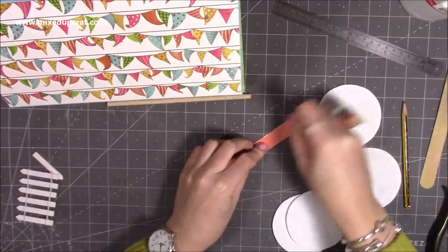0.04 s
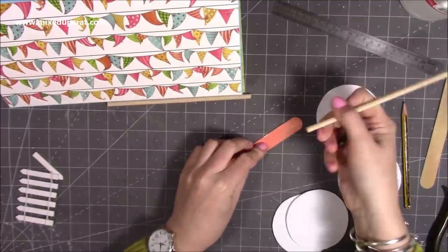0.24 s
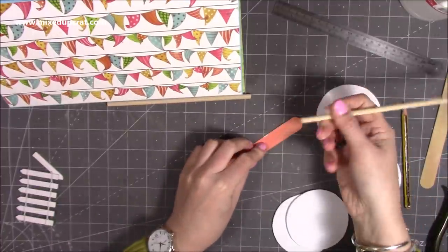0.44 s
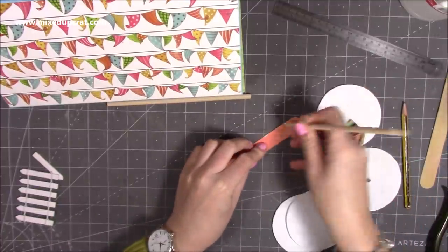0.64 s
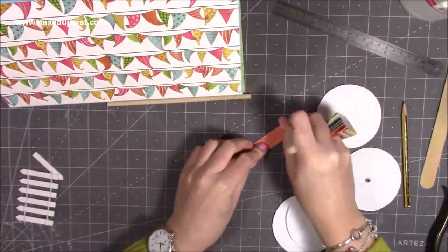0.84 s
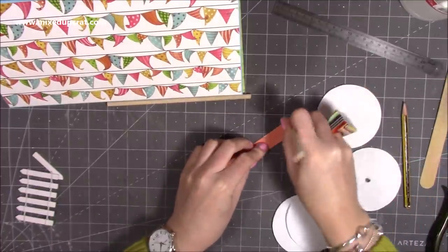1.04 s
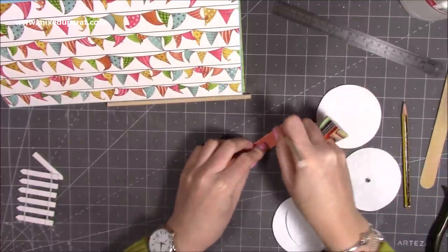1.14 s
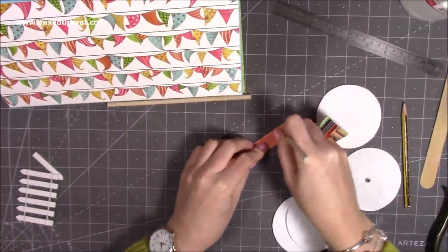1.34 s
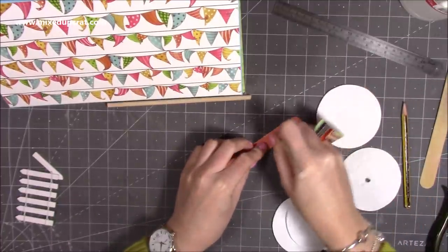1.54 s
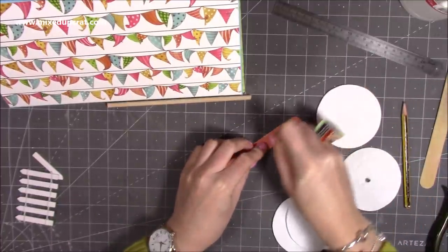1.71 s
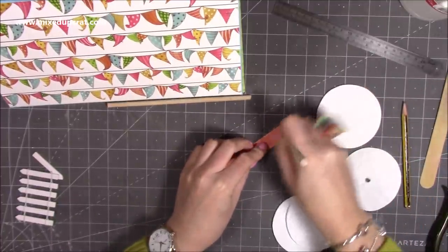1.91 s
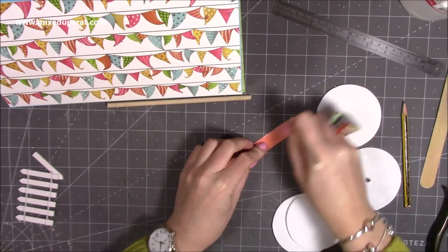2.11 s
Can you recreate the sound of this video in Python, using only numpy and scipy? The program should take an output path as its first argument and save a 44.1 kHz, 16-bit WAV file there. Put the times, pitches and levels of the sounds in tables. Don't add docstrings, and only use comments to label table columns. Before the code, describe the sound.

A small knock and the tail of a stroke, a near-silent pause with faint bangle clinks, then a wooden dowel end is scrubbed rapidly to and fro on an emery board, close up in a quiet room.

```python
import sys
import numpy as np
from scipy import signal
from scipy.fft import rfft, irfft
from scipy.io import wavfile
from scipy.ndimage import uniform_filter1d

SR = 44100
rng = np.random.default_rng(int(sys.argv[2]) if len(sys.argv) > 2 else 0)


def inscribe(sig):
    pcm = np.round(np.clip(np.atleast_2d(sig).T, -1, 1) * 32767)
    wavfile.write(sys.argv[1], SR, pcm.astype(np.int16))


def attenuation_scalar(level_db):
    decades = np.asarray(level_db, float) / 20
    return 10 ** decades


N = 95564


def evened(x):
    return x / np.sqrt(np.mean(x ** 2) + 1e-20)


def read(points, hz):
    f, value = np.transpose(points)
    return np.interp(np.log(hz + 1), np.log(f + 1), value)


def at_time(table, s):
    times, *columns = np.transpose(table)
    return [np.interp(s, times, column) for column in columns]


def add(mix, s, sound):
    at = round(s * SR)
    part = mix[max(at, 0):][:len(sound) + min(at, 0)]
    part += sound[max(-at, 0):][:len(part)]


def resonate(x, hz, width):
    r = np.exp(-np.pi * width / SR)
    poles = [1, -2 * r * np.cos(2 * np.pi * hz / SR), r * r]
    return signal.lfilter([(1 - r * r) / 2, 0, (r * r - 1) / 2], poles, x)


def colour(x, points):
    gain = attenuation_scalar(read(points, np.fft.rfftfreq(len(x), 1 / SR)))
    return irfft(rfft(x) * gain, len(x))


def filing():
    # start_s, length_s, grit_db, wood_db, hardest_place (0-1)
    pushes = [(.716, 0.064, -52.5, -37, 0.76), (.927, 0.034, -50.5, -33.5, 0.3),
              (1.11, 0.049, -49, -32, 0.52), (1.302, 0.044, -49, -34.5, 0.04),
              (1.490, 0.059, -46.5, -26, 0.73), (1.677, 0.054, -44, -26, 0.74),
              (1.854, 0.068, -45.5, -29, 0.24), (2.035, 0.058, -44.5, -27.5, 0.8)]
    pulls = [(-.05, 0.059, -51, -49, 0.44), (.822, 0.028, -52, -39, 0.3), (.853, 0.014, -59.5, -51, 0.68),
             (1.01, 0.06, -46.5, -33, 0.67), (1.212, 0.049, -46, -30.5, 0.32),
             (1.395, 0.058, -47.5, -32.5, 0.52), (1.586, 0.059, -46.5, -39, 1),
             (1.765, 0.061, -47, -34, 0.4), (1.949, 0.051, -44.5, -35, 0.092),
             (2.126, 0.057, -46.5, -35, 0.48)]
    # time_s, extra_db at the stroke ends, table_weight_db
    settling = [(0, 8, -14), (.7, -11.5, 5.5), (1.0, -6.5, -4), (1.4, 1.5, 0.5), (1.55, 1.5, -4.5),
                (1.95, -7.5, 1.5), (2.1, -0.5, -1.5)]
    # pitch_hz, density_db per Hz
    grit_colour = [(300, -6.5), (900, -2), (2000, 2.5), (3600, -5), (5300, -9), (9000, -10.5), (12000, -16),
                   (15500, -28.5)]
    wood_ends_db, grit_ends_db = -14, 0.5
    push_table_db, pull_table_db = -4.5, 3
    hiss_db, snag_hiss = 8.5, 0.34
    filing_cut_hz = 153

    drive, jump_db = catches(), snags()
    grit, weight, out = np.zeros(N), np.zeros(N), np.zeros(N)
    for way, (strokes, table_db) in enumerate([(pushes, push_table_db), (pulls, pull_table_db)]):
        for start, length, grit_db, wood_db, top in strokes:
            soft_db, weight_db = at_time(settling, start)
            scrape = attenuation_scalar(grit_db) * pressure(start, length, top, grit_ends_db + soft_db)
            grit += scrape
            weight += scrape * attenuation_scalar(table_db + weight_db)
            wood_push = pressure(start, length, top, wood_ends_db + soft_db / 2)
            wood_push = attenuation_scalar(wood_db - 2.5 + jump_db) * wood_push * drive
            ring_wood(out, start, way, wood_push)
    hiss = patchy(colour(drive + catches(), grit_colour))
    out += attenuation_scalar(hiss_db + snag_hiss * jump_db) * grit * hiss
    out += table_rumble(weight)
    return signal.sosfilt(signal.butter(4, filing_cut_hz, "high", fs=SR, output="sos"), out)


def catches():
    catches_per_s, spread_db, flicker_db = 9000, 1.5, -0.5
    hit = (rng.random(N) < catches_per_s / SR) * rng.choice([-1., 1.], N)
    flicker = uniform_filter1d(rng.standard_normal(N), size=130)
    flicker = evened(uniform_filter1d(flicker, size=130))
    size_db = spread_db * np.minimum(rng.exponential(1, N), 5)
    return evened(hit * attenuation_scalar(size_db + flicker_db * flicker))


def snags():
    # time_s, jump_db, dying_s
    grains = [(0.7313, 6, 0.0044), (0.7487, 9.5, 0.011), (0.762, -5, 0.0095), (0.834, 13, 0.011),
              (0.943, 3, 0.0096), (1.0196, 0, .005), (1.0363, 6.5, 0.007), (1.052, 2.5, 0.0045),
              (1.071, 13, 0.0064), (1.1292, 8, 0.0035), (1.234, 5.5, .007), (1.3177, 8, 0.0052),
              (1.331, 7.5, 0.0046), (1.4314, 5, 0.0086), (1.5062, 7.5, .006), (1.526, 1, 0.0061),
              (1.539, 1.5, 0.0045), (1.631, 3, 0.004), (1.6868, 7.5, 0.0051), (1.705, 3.5, 0.011),
              (1.722, -9, 0.005), (1.8022, 11.5, 0.012), (1.8644, 5.5, 0.017), (1.8955, 5.5, 0.0034),
              (1.9555, 1, 0.0045), (2.049, 6, 0.0056), (2.072, 4, 0.0053)]
    out, t = np.zeros(N), np.arange(SR // 20) / SR
    for s, jump_db, dying in grains:
        add(out, s, jump_db * np.exp(-(t / dying) ** 2))
    return out


def pressure(start, length, top, ends_db):
    attack_s, release_s = 0.0049, 0.0067
    drag_db, drag_db_per_s = -12, 311
    t = np.arange(N) / SR - start
    top = np.clip(top, .1, .9)
    off = np.where(t < top * length, 1 - t / (top * length), (t / length - top) / (1 - top))
    held = np.clip((length - t) / release_s + .5, 0, 1) * attenuation_scalar(ends_db * np.clip(off, 0, 2) ** 2)
    drag = attenuation_scalar(drag_db - drag_db_per_s * np.maximum(t - length, 0))
    return np.clip(t / attack_s, 0, 1) * (held + drag)


def ring_wood(out, start, way, wood_push):
    # pitch_hz, width_hz, push_db, pull_db
    wood = [(1106.7, 25.6, 1, -14), (1307, 120, -2.5, 1.5), (1582, 58, -1.5, 1.5), (1828, 100, 1.5, 3.5),
            (1924, 210, -8.5, 2.5), (2358, 240, 0, 3.5), (2590, 240, -1, -0.5), (889, 94, -4, -6),
            (3060, 2200, -17, -10), (4200, 100, -17, -51)]
    # stroke_start_s, favoured_hz, loss_db one octave off
    grip = [(0, 1390, 30), (.716, 1414, 57), (.822, 1600, 0), (.927, 1450, 43), (1.01, 1670, 20),
            (1.11, 1350, 10), (1.212, 1820, 3), (1.304, 1400, 13), (1.397, 1710, 8), (1.491, 1370, 6),
            (1.587, 1770, 17), (1.677, 1610, 6), (1.768, 2100, 20), (1.856, 1940, 6.5), (1.951, 1700, 8),
            (2.038, 1620, 3), (2.126, 1630, 14)]
    favoured_hz, loss_db = at_time(grip, start)
    gains = attenuation_scalar([row[2 + way] - max(loss_db, 0) * np.log2(row[0] / favoured_hz) ** 2 for row in wood])
    gains = gains / np.linalg.norm(gains)
    shifts = 1 + 0.012 * rng.uniform(-1.1, 1, len(wood))
    at = max(round(start * SR), 0)
    wood_push = wood_push[at:at + SR // 4]
    for j, (hz, width, *_) in enumerate(wood):
        gain = (-1) ** j * gains[j] / np.sqrt(np.pi * width / SR)
        add(out, at / SR, gain * resonate(wood_push, hz * shifts[j], width))


def table_rumble(weight):
    # pitch_hz, width_hz, level_db
    table_modes = [(150, 70, -8), (205, 95, -1), (310, 110, -4), (400, 120, -3), (525, 120, -2),
                   (700, 180, -5)]
    rumble = weight * rng.standard_normal(N)
    out = np.zeros(N)
    for hz, width, db in table_modes:
        mode = resonate(resonate(rumble, hz, width), hz, 2.14 * width)
        out += attenuation_scalar(db) / np.sqrt(np.pi * width / SR) * mode
    return out


def patchy(x):
    patchy_db = 3
    z = signal.stft(x, nperseg=128)[2]
    field = uniform_filter1d(rng.standard_normal(z.shape), size=4, axis=0)
    field = evened(uniform_filter1d(field, size=9, axis=1))
    return evened(signal.istft(z * attenuation_scalar(patchy_db * field), nperseg=128)[1][:N])


def bangles():
    # time_s, main_db, low_db, top_db, thin_db (ring level of each mode group)
    clinks = [(0.102, -65, -50, -62, -57), (0.1105, -40, -62, -43, -53), (.4948, -68, -57.5, -85, -73),
              (0.5931, -44.5, -60.5, -54, -56), (0.9282, -32, -66, -40, -48),
              (0.9458, -42, -32, -41, -37.5), (.9744, -65, -63, -67, -51), (1.1366, -33, -45, -38, -55),
              (1.169, -43.5, -38, -66, -45), (1.1972, -40.5, -42, -55, -50), (1.323, -33.5, -43, -44, -49),
              (1.3368, -37, -59, -44, -46), (1.3668, -36, -34.5, -60, -42.5), (1.55, -40, -46, -77, -48),
              (1.656, -53, -65, -65, -61), (1.6902, -32.5, -36, -45, -36.5), (1.8254, -42, -62, -79, -52),
              (1.89, -34.5, -48, -44, -46), (1.9174, -56, -55, -75, -63), (1.942, -49, -54, -58, -50),
              (2.027, -48, -58, -70, -50), (2.0602, -37.5, -39, -53, -45), (2.0883, -67, -47, -70, -70)]
    # pitch_hz, t60_s, level_db within the group
    mode_groups = [
        [(5648, .19, -14), (5676, .075, -6), (5745, .035, -5), (6200, .025, -12), (8200, .08, -9),
         (8165, .14, -20)],
        [(3500, .07, -4), (3560, .04, -9), (7420, .06, -11)],
        [(12480, .05, -2), (12620, .025, -4)],
        [(9900, .06, -1), (8850, .035, -9), (11700, .035, -11), (14600, .03, -14), (15300, .03, -14)],
    ]
    spread_db = 2
    splash_db, splash_hz, splash_s = -15, 9500, 0.002
    out, t = np.zeros(N), np.arange(SR // 100) / SR
    for s, *levels in clinks:
        for level_db, group in zip(levels, mode_groups):
            for hz, t60, db in group:
                strike_db = level_db + db + spread_db * rng.uniform(0.14, 1)
                add(out, s, ring(hz, strike_db, t60))
        splash = evened(resonate(rng.standard_normal(len(t)), splash_hz, 5500)) * np.exp(-t / splash_s)
        add(out, s, attenuation_scalar(max(levels) + splash_db) * splash)
    return out


def ring(hz, db, t60):
    roughness, rise_s = .35, .0007
    t = np.arange(SR // 4) / SR
    rough = 1 + roughness * evened(uniform_filter1d(rng.standard_normal(len(t)), size=150))
    return attenuation_scalar(db - 60 * t / t60) * np.minimum(t / rise_s, 1) * rough * np.sin(2 * np.pi * hz * t)


def knocks():
    # time_s, ring_db, pitch_hz, t60_s
    taps_and_ticks = [(.001, -29, 8280, 0.02), (.0055, -25, 1364, 0.011), (.019, -55, 1410, 0.041),
                      (.096, -49, 1290, 0.013), (0.103, -43, 7420, 0.031), (.111, -38.5, 8180, 0.022),
                      (.495, -57, 8100, .03), (0.663, -46, 1280, .035), (0.664, -53.5, 1530, 0.027),
                      (.662, -52, 880, 0.026), (.665, -58, 2900, .015), (.661, -52.5, 8300, 0.028),
                      (.663, -54, 9200, .02), (.681, -64, 9000, .01), (0.747, -29, 1460, 0.037),
                      (.785, -64, 8260, .04), (.904, -60, 8500, 0.0087), (.904, -63, 11200, .008),
                      (.921, -38, 1380, 0.017), (.946, -27.5, 1417, 0.049), (.975, -49, 8850, .045),
                      (1.236, -33, 1720, .015), (1.896, -23.5, 1146, 0.025), (1.9423, -49, 7500, .05),
                      (2.026, -48, 7400, .05), (1.545, -47, 3520, .05), (1.866, -43, 4170, .06)]
    out = np.zeros(N)
    for s, db, hz, t60 in taps_and_ticks:
        add(out, s, ring(hz, db, t60) + ring(hz * 1.06, db - 5, t60))
    return out


def slides():
    # middle_s, length_s, level_db, whistle_1_hz, whistle_2_hz
    rubs = [(.09, .03, -77, 9600, 12600), (.243, .02, -70, 4000, 4100), (.244, .022, -70, 9800, 7000),
            (.378, .035, -71, 10000, 13200), (.482, .028, -71, 9600, 6800), (.54, .06, -79, 9500, 12700)]
    hiss_db, whistle_width_hz = -1, 300
    out, t = np.zeros(N), np.arange(-2000, 2000) / SR
    for s, length, db, *whistles in rubs:
        noise = rng.standard_normal(len(t))
        rub = attenuation_scalar(hiss_db) * evened(resonate(noise, 9200, 7000))
        for hz in whistles:
            rub = rub + evened(resonate(noise, hz, whistle_width_hz))
        add(out, s + t[0], attenuation_scalar(db) * rub * np.exp(-(t / (length / 2)) ** 2))
    return out


def room(x):
    # pitch_hz, t60_s
    decay = [(200, 0.46), (1500, 0.13), (6000, 0.092), (14000, 0.055)]
    taps = np.zeros(SR // 2)
    at = np.arange(200, SR // 2 - 20, 20)
    taps[at + rng.integers(0, 20, len(at))] = rng.choice([-1., 1.], len(at))
    hz, t, z = signal.stft(taps, SR, nperseg=256)
    dying = attenuation_scalar(-60 * t / read(decay, hz)[:, None])
    tail = signal.istft(z * dying, SR, nperseg=256)[1]
    return signal.fftconvolve(x, tail / np.linalg.norm(tail))[:N]


def air():
    # pitch_hz, density_db per Hz
    hush_colour = [(40, 3), (150, 0), (450, -4), (700, -8), (1300, -9), (4400, -18), (10000, -26),
                   (15500, -38)]
    hush_db = -60
    hum_hz, hum_width_hz, hum_db = 826, 116, -66.5
    hum = resonate(rng.standard_normal(N), hum_hz, hum_width_hz)
    hum = resonate(hum, hum_hz, 2 * hum_width_hz)
    hush = colour(rng.standard_normal(N), hush_colour)
    return attenuation_scalar(hush_db) * evened(hush) + attenuation_scalar(hum_db) * evened(hum)


def scene():
    room_db = -11.5
    near = filing() + bangles() + knocks() + slides()
    return (near + attenuation_scalar(room_db) * room(near) + air())[None]


def top_cut(x):
    return signal.sosfilt(signal.butter(12, 15730, fs=SR, output="sos"), x)


def record(dry):
    low_cut = signal.butter(2, 186, "high", fs=SR, output="sos")
    high_cut = signal.butter(10, 15500, fs=SR, output="sos")
    mix = signal.sosfilt(np.vstack([low_cut, high_cut]), dry)
    return top_cut(mix)


dry = scene()
out = record(dry)
inscribe(out)
```